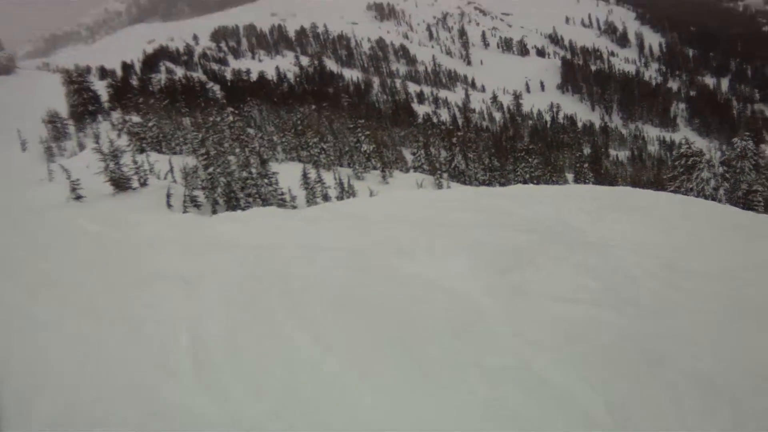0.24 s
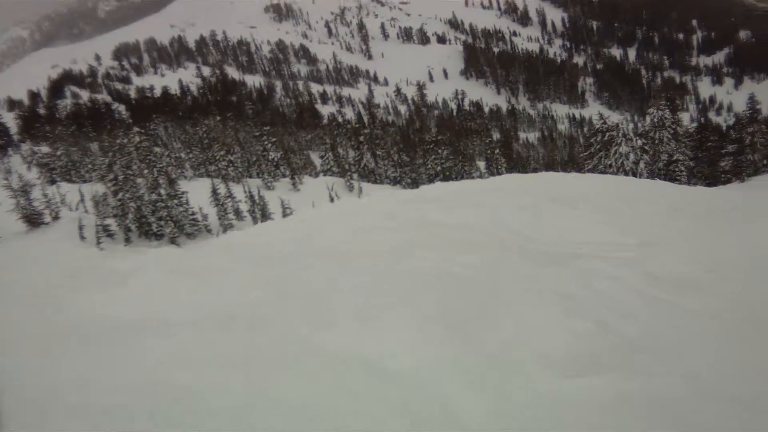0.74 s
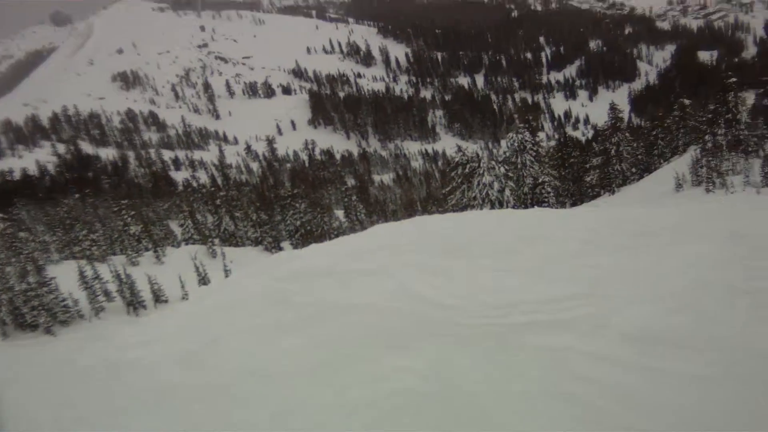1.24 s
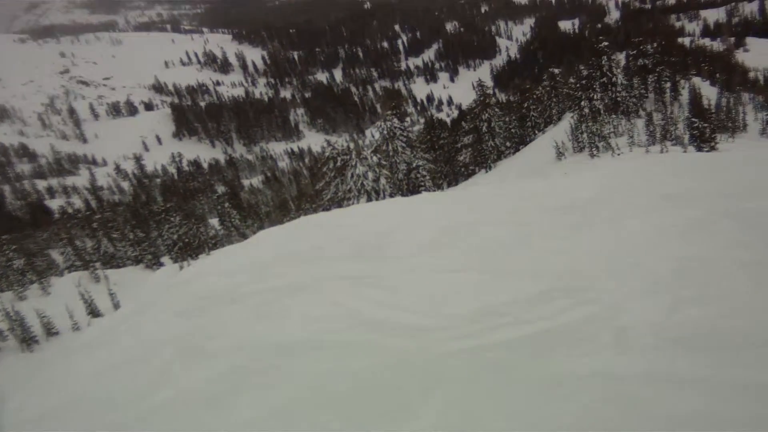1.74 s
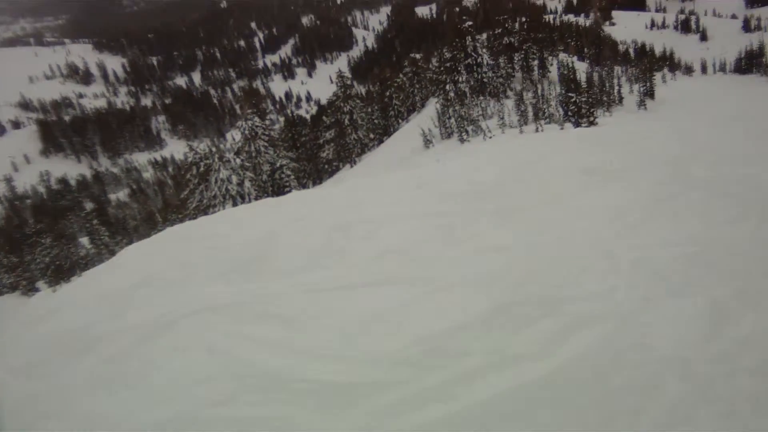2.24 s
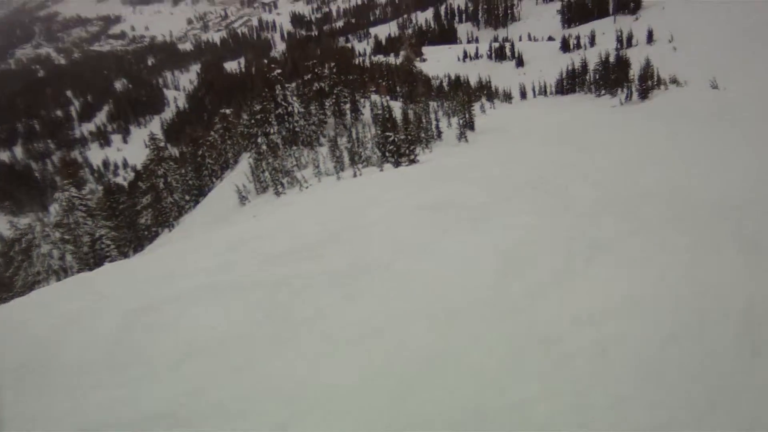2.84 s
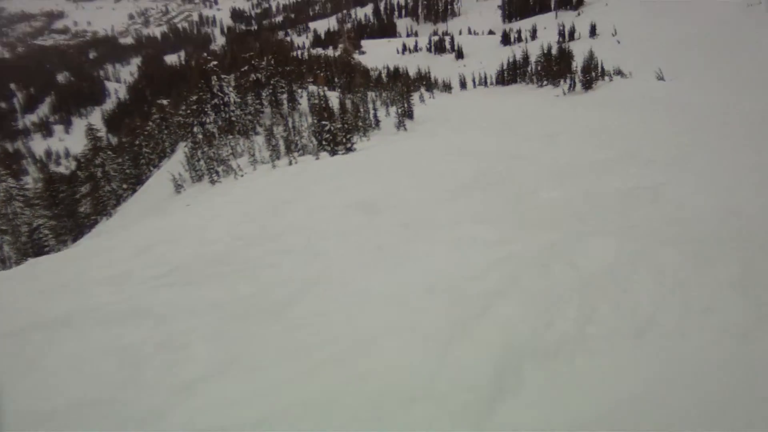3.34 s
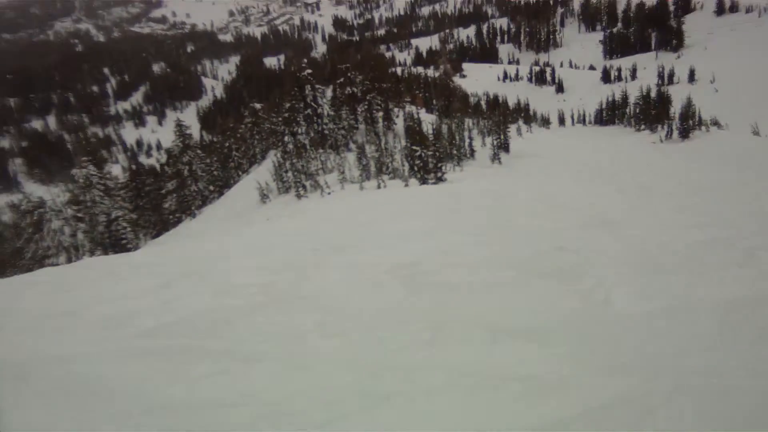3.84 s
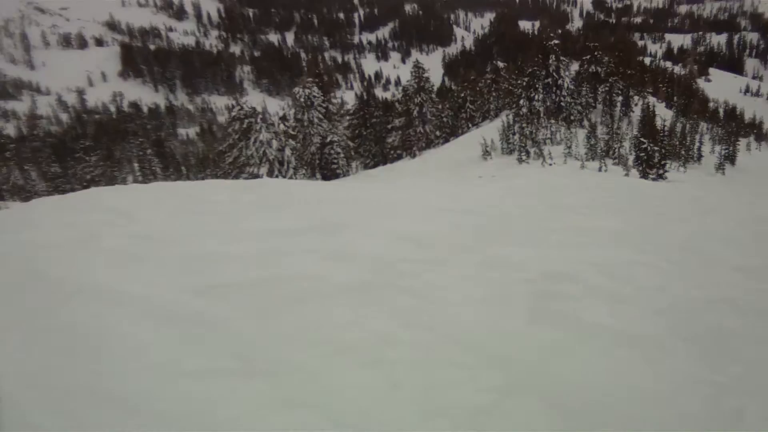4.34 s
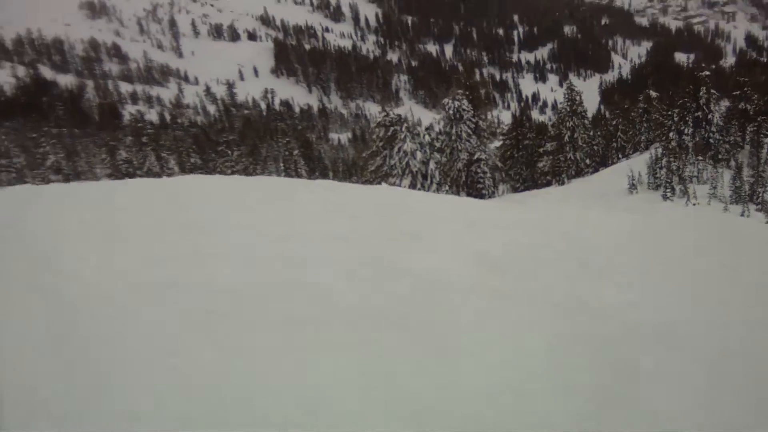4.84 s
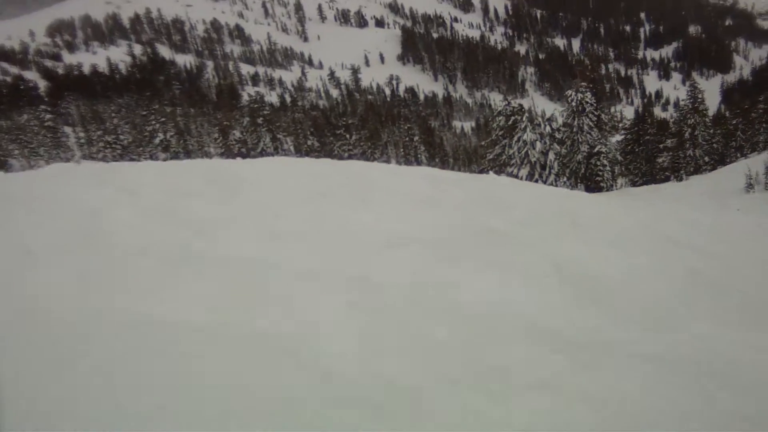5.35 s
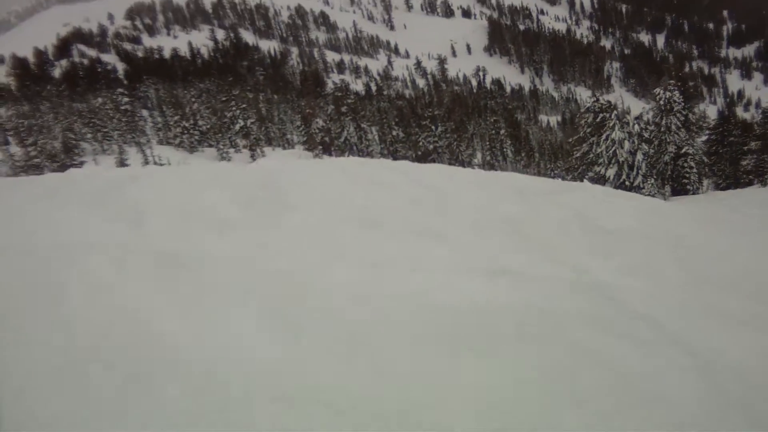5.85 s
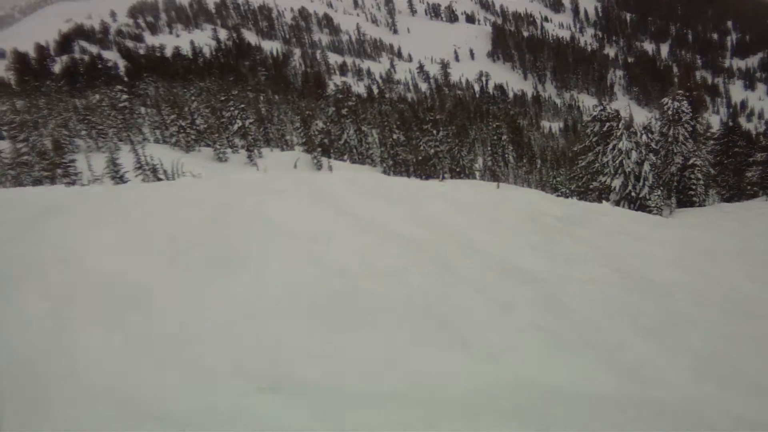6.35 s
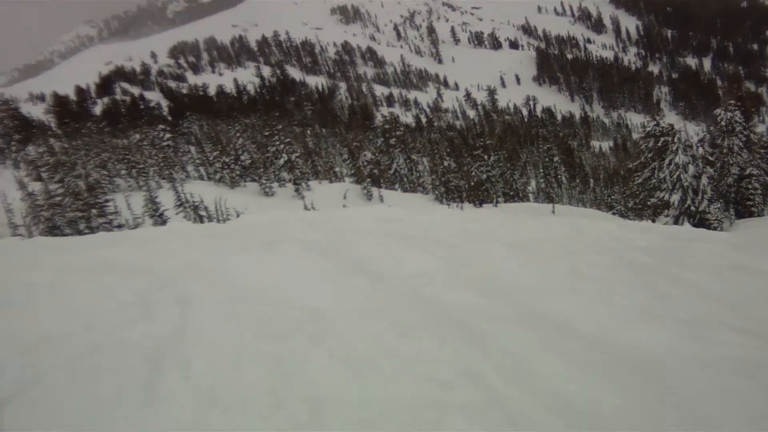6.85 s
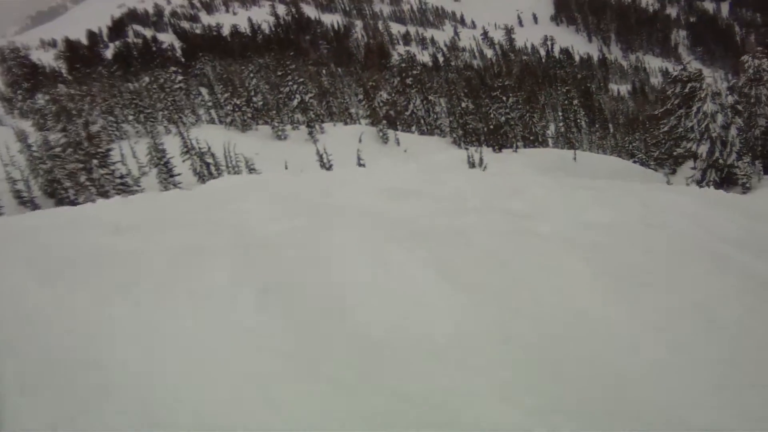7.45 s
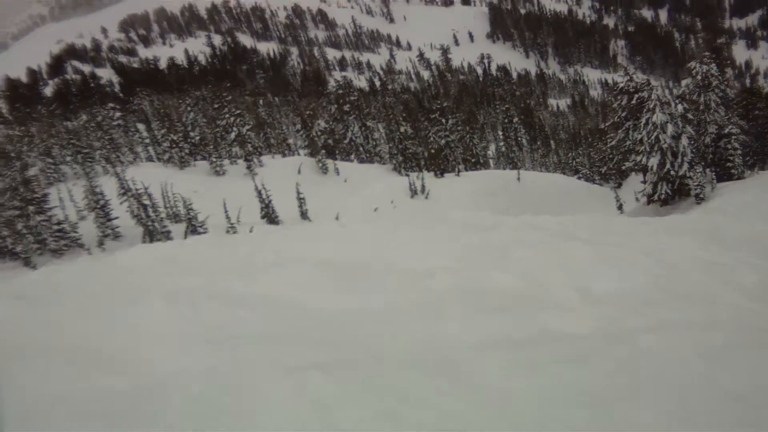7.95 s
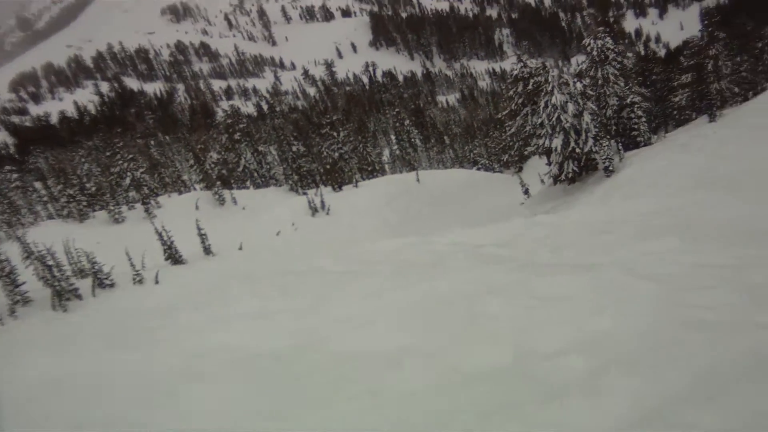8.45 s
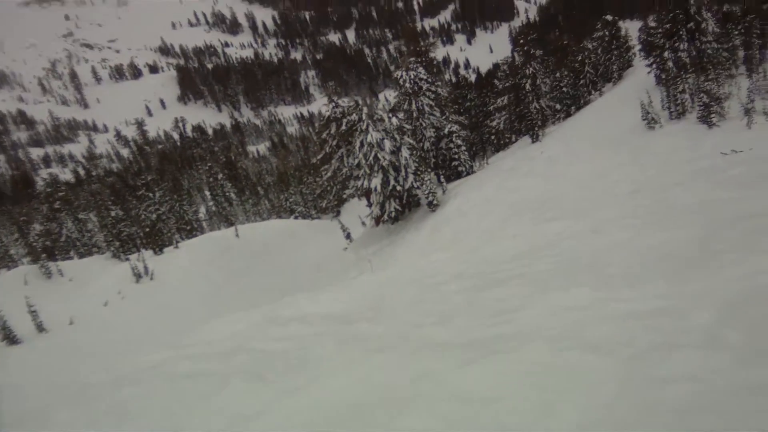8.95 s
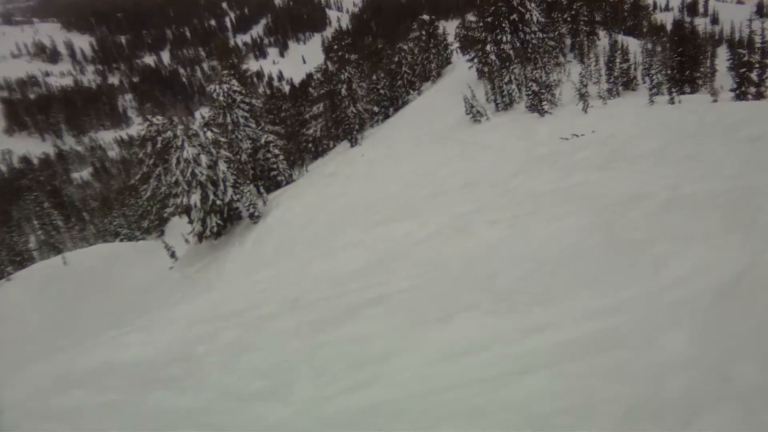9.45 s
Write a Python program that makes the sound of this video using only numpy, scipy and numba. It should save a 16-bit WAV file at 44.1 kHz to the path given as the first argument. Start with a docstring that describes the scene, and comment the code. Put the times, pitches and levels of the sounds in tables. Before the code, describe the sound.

Wind buffets a small microphone in crackling, thudding bursts while skis rush softly over snow, hissing and rasping through linked turns.

```python
"""Wind buffets a small hand-held camera while a skier links turns down a soft snow slope.
The air hits the microphone port as filtered random pulses: faster flow is louder and brighter, its eddies smaller.
Now and then air skimming the port rings it like a bottle. Under the wind the skis rush over the snow, hiss and
throw up spray, all shaped noise coloured by the camera's housing. Edges rasp on firm patches and gear squeaks."""
import sys
import numpy as np
from scipy import signal
from scipy.fft import rfft, irfft
from scipy.io import wavfile
from scipy.ndimage import uniform_filter1d
from numba import njit

SR = 44100
rng = np.random.default_rng(int(sys.argv[2]) if len(sys.argv) > 2 else 0)


def bounce(signal):
    """Save signal as a 16-bit WAV file at the path given by the first command-line argument."""
    frames = np.transpose(np.atleast_2d(signal))
    limited = np.clip(frames, -1, 1)
    pcm = np.round(limited * 32767).astype(np.int16)
    wavfile.write(sys.argv[1], SR, pcm)


N = 427329
T = np.arange(N) / SR  # time of each sample, s
FREQS = np.maximum(np.arange(N // 2 + 1) * SR / N, 1)  # frequency of each spectrum bin, Hz

# rush of the ski bases, following speed and weight on the snow: (time [s], level [dB])
GLIDE_LEVELS = [(0, -60.5), (.33, -68.5), (.5, -65.5), (.6, -63.5), (.68, -69.5), (.8, -70), (1.05, -76.5),
                (1.5, -63), (2.1, -53.5), (2.85, -64), (3.65, -56), (4.08, -59.5), (4.22, -60),
                (4.6, -54.5), (4.73, -57.5), (4.88, -55.5), (5.05, -58), (5.85, -69.5), (6.2, -63.5),
                (7.95, -66.5), (8.15, -73), (8.28, -74), (8.39, -66.5), (8.5, -71), (8.87, -79),
                (8.96, -70.5), (9.12, -60), (9.69, -61.5)]


def undb(db):
    """Decibels to gain."""
    return 10 ** (np.asarray(db) / 20)


def unit(x):
    """Scale to rms 1."""
    return x / np.sqrt(np.mean(x ** 2))


def level_curve(table):
    """Join the (time, level) points of a table by straight lines."""
    times, levels = np.transpose(table)
    return np.interp(T, times, levels)


def walk(rate_hz, size=16384):
    """Smooth random motion up to about rate_hz, spread about 1."""
    hz = np.arange(size // 2 + 1) * SR / N
    slow = irfft(rfft(rng.standard_normal(size)) / (1 + (hz / rate_hz) ** 4))
    return np.interp(T, np.linspace(0, N / SR, size), unit(slow))


def waver_db(rate_hz, depth_db):
    """Random wavering in dB that never strays beyond twice depth_db."""
    return depth_db * 2 * np.tanh(walk(rate_hz) / 2)


def flutter(rate_hz, depth_db):
    """A randomly wavering gain of mean power 1."""
    return unit(undb(waver_db(rate_hz, depth_db)))


def grains(per_second, spread_db):
    """Random single-sample impulses of uneven size and either sign, rms 1 overall."""
    hit = rng.random(N) < per_second / SR
    sign = rng.choice([-1, 1], N)
    size = undb(spread_db * np.clip(rng.standard_normal(N), -2, 2))
    return unit(hit * sign * size)


def colour(x, spectrum, lo_hz, hi_hz):
    """Shape white noise x by a spectrum, so that its band lo_hz-hi_hz has rms about 1."""
    hz, db = np.transpose(spectrum)
    gain = undb(np.interp(np.log(FREQS), np.log(hz), db))
    in_band = (FREQS > lo_hz) & (FREQS < hi_hz)
    band_rms = np.sqrt(np.mean(gain ** 2 * in_band))
    return irfft(rfft(unit(x)) * gain / band_rms, N)


def band(hz, width_hz):
    """Noise in one resonance, rms 1."""
    resonance = 1 / (1 + ((FREQS - hz) / (width_hz / 2)) ** 2)
    return unit(irfft(rfft(rng.standard_normal(N)) * resonance, N))


def swell(s, db, half):
    """Gain of a bell-shaped swell centred on s; it is down to 37 % at half seconds to either side."""
    return undb(db) * np.exp(-((T - s) / half) ** 2)


def shifted(x, octaves):
    """Slide the whole spectrum of x up or down over time by reading it faster or slower."""
    position = np.cumsum(2 ** octaves) % N
    return np.interp(position, np.arange(N), x)


def steadied(x, window_s, share):
    """Even out a share of the chance swings in the level of x."""
    size = int(window_s * SR)
    power = uniform_filter1d(uniform_filter1d(x ** 2, size), size)
    return x / np.maximum(power, 1e-6) ** (share / 2)


@njit
def lowpass(x, hz, order):
    """A chain of one-pole low-passes whose corner moves every sample."""
    y, state = np.empty(len(x)), np.zeros(order)
    for i in range(len(x)):
        g = np.tan(np.pi * min(hz[i], .4 * SR) / SR)
        v = x[i]
        for k in range(order):
            step = (v - state[k]) * g / (1 + g)
            v = state[k] + step
            state[k] = v + step
        y[i] = v
    return y


def squeaks():
    """Tiny squeaks of the gear: brief, thin stick-slip tones."""
    # (time [s], level [dB], half length [s], pitch [Hz])
    squeak_list = [(1.326, -79, .009, 6550), (7.768, -76.5, .011, 6480)]
    # a sine times the square root of 2 has rms 1
    return sum(swell(s, db, half) * np.sqrt(2) * np.sin(2 * np.pi * hz * T) for s, db, half, hz in squeak_list)


def edges():
    """Steel edges rasp over firmer patches of snow: swells of noise, each in one broad resonance."""
    # (time [s], level [dB], half length [s], centre [Hz])
    rasp_list = [(.84, -79, .04, 1900), (1.275, -78.5, .16, 2530), (1.365, -75, .008, 4000),
                 (2.573, -69, .03, 3700), (2.68, -67, 0.088, 2380), (2.958, -69, 0.064, 3600),
                 (3.593, -71, 0.073, 3370), (4.15, -79, 0.089, 4000), (5.01, -72, 0.15, 1800),
                 (5.777, -72, .05, 2000), (6.07, -72, 0.054, 2200), (9.044, -71, .003, 2080)]
    width = 0.48  # as a share of the centre
    return sum(swell(s, db, half) * band(hz, width * hz) for s, db, half, hz in rasp_list)


def carve(bite, apex, swell_db_per_s, fade_db_per_s):
    """Gain of one turn: the edges bite quickly, press harder up to the apex, then ease off."""
    bite_s = 0.0085  # time the edges take to catch
    below_db = np.maximum(swell_db_per_s * (apex - T), fade_db_per_s * (T - apex))
    return np.clip((T - bite) / bite_s, 0, 1) * undb(-below_db)


def snow_levels():
    """Gains of rush, hiss and spray: the turns add their power to that of skis running flat."""
    # turns, levels before the trims in skis():
    # (edges bite [s], apex [s], hiss of the edges at the apex [dB], fine spray at the apex [dB])
    turn_list = [(0, 0.027, -72.5, -83.5), (0.4, 0.48, -73, -80), (2.13, 2.81, -64.5, -75),
                 (4.805, 5.125, -67.5, -75.5), (6.9, 7.004, -70, -77.5), (7.752, 7.88, -73, -78),
                 (9.023, 9.255, -74, -79.5)]
    running_hiss_db = -15.5  # hiss of skis running flat, relative to the rush
    faint_hiss_db, faint_spray_db = -83.5, -82  # what stays between turns
    base = undb(level_curve(GLIDE_LEVELS))
    edge_power = (base * undb(running_hiss_db)) ** 2 + undb(faint_hiss_db) ** 2
    powder_power = undb(faint_spray_db) ** 2
    for bite, apex, hiss_db, spray_db in turn_list:
        edge = undb(hiss_db) * carve(bite, apex, swell_db_per_s=14.5, fade_db_per_s=11)
        powder = undb(spray_db) * carve(bite, apex, swell_db_per_s=7.5, fade_db_per_s=8)
        edge_power = edge_power + edge ** 2
        powder_power = powder_power + powder ** 2
    return base, np.sqrt(edge_power), np.sqrt(powder_power)


def skis():
    """The bases pack the snow with a hollow rush, the edges shear crystals, and loose powder sprays."""
    # spectra of the rush, the hiss and the spray: (frequency [Hz], relative level [dB per Hz])
    rush_spectrum = [(30, -23), (100, -13.5), (220, -11), (350, -4), (530, 0.5), (650, -5), (800, -11),
                     (1050, -20.5), (1600, -23.5), (3000, -77)]
    hiss_spectrum = [(500, -25), (1000, -4.5), (1700, 0.5), (2400, 3), (2900, -1), (3170, -7), (3550, -5),
                     (4280, -4), (4750, -20), (5850, -10.5), (6750, -16.5), (7500, -23), (9000, -20),
                     (15000, -24)]
    spray_spectrum = [(2500, -13), (5000, -1.5), (6500, 3), (7550, -2), (8300, 0), (9100, -1.5),
                      (9800, 1.5), (10250, -2), (10900, 2), (11650, -2.5), (12400, 1.5), (15500, -0.5)]
    hiss_trim_db, spray_trim_db = -0.5, -0.73
    rise_per_db, wander = 0.0041, 0.06  # shift of the rush, octaves: with its level, and by chance

    base, edge, powder = snow_levels()
    glide_db = level_curve(GLIDE_LEVELS)
    octaves = rise_per_db * (glide_db - glide_db.mean()) + wander * walk(rate_hz=9.01)
    rush = colour(grains(per_second=5000, spread_db=3.0), rush_spectrum, 346, 570)
    rush = shifted(rush, octaves) * flutter(rate_hz=33, depth_db=1.7)
    hiss = colour(grains(per_second=14000, spread_db=6.0), hiss_spectrum, 1760, 3800)
    hiss = hiss * flutter(rate_hz=48, depth_db=1.08)
    spray = colour(rng.standard_normal(N), spray_spectrum, 6100, 13400)
    spray = spray * flutter(rate_hz=33, depth_db=1.0)
    uneven_snow = flutter(rate_hz=13.0, depth_db=0.8)  # moves rush and hiss together
    on_snow = uneven_snow * (rush * base + hiss * edge * undb(hiss_trim_db))
    return on_snow + spray * powder * undb(spray_trim_db)


def skim():
    """Air skims across the port and blows it like a bottle, ringing its broad, hollow resonance."""
    # (time [s], level [dB], half length [s])
    skim_list = [(1.73, -46.5, 0.012), (1.832, -44, .014), (2.386, -51.5, 0.033), (3.818, -42.5, .016),
                 (3.876, -48, .012), (3.92, -50, 0.018), (7, -46.5, 0.011), (7.038, -56.5, 0.04),
                 (7.084, -41.5, 0.011), (7.107, -42.5, 0.01)]
    # spectrum of the port's resonance: (frequency [Hz], relative level [dB per Hz])
    port_spectrum = [(300, -18.5), (550, 2), (760, -0.5), (1080, -4), (1450, -17), (2500, -37), (5000, -74)]
    blow = sum(swell(s, db, half) for s, db, half in skim_list)
    puffs = grains(per_second=2500, spread_db=3)
    return blow * colour(puffs, port_spectrum, 300, 2500)


def airflow():
    """Level (dB) and eddy roll-off (Hz) of the flow, before wind() adjusts them: steady air plus buffets."""
    # steady airflow over the microphone, following the skier's speed: (time [s], level [dB])
    steady_levels = [(0, -73), (.98, -76.5), (1.06, -68.5), (1.22, -61.5), (1.57, -55), (1.8, -40),
                     (2.3, -53), (3.0, -46.5), (3.4, -49.5), (3.96, -52), (4.12, -66), (5.0, -69),
                     (5.85, -65), (6.4, -56.5), (7.3, -62.5), (8.05, -70), (8.15, -83.5), (8.45, -77),
                     (8.88, -68.5), (9.0, -61.5), (9.4, -57)]
    # buffets, where the flow catches the port, holds on and lets go:
    # (start [s], rise before it [s], length [s], level [dB], eddy roll-off [Hz])
    buffet_list = [(1.19, 0.0035, .022, -57.5, 324), (1.469, 0.0054, .027, -46, 800),
                   (1.623, .003, 0.049, -40, 660), (1.697, 0.0024, 0.027, -37.5, 1270),
                   (1.737, .003, 0.28, -41.5, 930), (1.924, 0.012, 0.026, -32, 1780),
                   (1.973, 0.0064, 0.038, -30, 1760), (2.056, .003, 0.026, -45, 890),
                   (2.121, .002, 0.091, -45.5, 920), (2.347, .005, 0.18, -47.5, 810),
                   (2.79, .02, .115, -46, 875), (3.5, .01, 0.16, -46, 860),
                   (3.718, 0.0057, 0.031, -42, 1100), (3.781, 0.004, 0.16, -48, 1180),
                   (3.808, 0.013, 0.022, -39.5, 1580), (3.853, .005, 0.022, -44, 1370),
                   (5.298, 0.013, 0.015, -55, 346), (5.551, .05, 0.06, -51.5, 535),
                   (5.681, 0.031, 0.035, -48, 460), (6.405, 0.004, .04, -45, 990),
                   (6.439, 0.004, 0.072, -38, 1120), (6.499, 0.006, 0.032, -34.5, 1140),
                   (6.545, .003, .04, -37, 1110), (6.618, 0.0026, .05, -36.5, 1220),
                   (6.688, .003, .067, -38.5, 930), (6.755, 0.013, 0.041, -36, 1060),
                   (6.821, .002, .039, -36.5, 940), (6.87, .003, 0.038, -45.5, 814),
                   (7.092, 0.0033, .084, -46.5, 640), (8.502, 0.0037, .042, -59.5, 370),
                   (8.587, .008, 0.21, -55, 564), (9.075, .003, .03, -48.5, 560),
                   (9.101, 0.0077, 0.028, -41.5, 650), (9.146, 0.0045, 0.069, -40.5, 880),
                   (9.219, .004, 0.045, -39.5, 850), (9.461, .004, 0.25, -49, 705),
                   (9.553, 0.005, .045, -44, 1000)]
    release_s = 0.012
    # faster air makes smaller eddies: the roll-off is calm_hz + rise_hz at reference_db,
    # and the rise doubles every doubling_db
    calm_hz, rise_hz, reference_db, doubling_db = 372, 258, -50, 11.5

    steady_db = level_curve(steady_levels)
    force = undb(steady_db)
    edge_hz = calm_hz + rise_hz * 2 ** ((steady_db - reference_db) / doubling_db)
    for s, rise, length, db, hz in buffet_list:
        near = (T > s - 3 * rise) & (T < s + length + 3 * release_s)
        age = T[near] - s
        before = np.minimum(age, 0) / rise
        after = np.maximum(age - length, 0) / release_s
        grip = np.exp(-before ** 2 - after ** 2)
        force[near] += grip * (undb(db) - force[near])
        edge_hz[near] += grip * (hz - edge_hz[near])
    return 20 * np.log10(force), edge_hz


def eddies(pressure, edge_hz, low_hz, order):
    """Turbulence dies away ever more steeply above edge_hz; the port passes little below low_hz. Rms near 1."""
    y = lowpass(pressure, edge_hz * np.sqrt(order / 2), order)
    # taking away the lows leaves the highs
    y = y - lowpass(y, low_hz, order=1)
    y = y - lowpass(y, np.full(N, 24.), order=1)
    width_hz = 2 / 3 * edge_hz / (1 + np.sqrt(2) * low_hz / edge_hz) ** 2
    return y * np.sqrt(SR / 2 / width_hz)  # make up for the power lost outside the band


def wind():
    """Eddies strike the port in clumps; each surge is both louder and brighter."""
    # single gusts that slap the port, the shortest as sharp cracks; level and roll-off before the trims below:
    # (time [s], level [dB], eddy roll-off [Hz], fade [s])
    gust_list = [(1.218, -42, 350, 0.0038), (1.322, -50.5, 400, 0.0083), (1.485, -44, 910, 0.0043),
                 (1.604, -39, 520, 0.0043), (1.619, -36.5, 1350, 0.0024), (1.645, -42, 1640, 0.0038),
                 (1.659, -40, 1640, 0.006), (1.677, -39.5, 1750, 0.0028), (1.698, -35, 1290, .004),
                 (1.71, -30, 1550, 0.004), (1.723, -39.5, 1560, 0.0048), (1.753, -38, 2200, 0.0013),
                 (1.767, -39.5, 1100, 0.0028), (1.789, -36, 1480, 0.01), (1.809, -36.5, 1330, 0.0072),
                 (1.83, -36, 1240, 0.0037), (1.836, -46, 1750, 0.0017), (1.86, -34, 950, 0.0054),
                 (1.868, -41, 1550, 0.00086), (1.877, -37, 1440, 0.0012), (1.912, -35.5, 1550, 0.0036),
                 (1.929, -29.5, 2500, 0.0021), (1.942, -33, 3000, 0.0023), (1.977, -38.5, 3960, 0.00067),
                 (1.981, -29, 3400, 0.00091), (2.008, -32.5, 2480, 0.0028), (2.071, -41, 1040, 0.0037),
                 (2.126, -41.5, 1150, 0.0039), (2.162, -29.5, 1320, 0.0037), (2.175, -47, 1600, 0.002),
                 (2.223, -40, 600, 0.0059), (2.309, -44.5, 1020, 0.012), (2.37, -42, 950, 0.008),
                 (2.409, -41.5, 1300, 0.0027), (2.467, -35.5, 980, 0.0026), (2.478, -43.5, 1140, 0.0029),
                 (2.491, -45, 1500, 0.0014), (2.505, -40.5, 840, 0.0036), (2.532, -44, 950, 0.0035),
                 (2.548, -40.5, 900, 0.0037), (2.618, -43, 600, .004), (2.686, -44, 550, .005),
                 (2.748, -46, 950, 0.0035), (2.771, -38, 870, 0.0032), (2.82, -38, 1250, 0.0021),
                 (2.867, -44, 1160, 0.0099), (2.885, -41, 1100, 0.0082), (3.034, -37, 1220, 0.003),
                 (3.089, -38, 583, 0.0055), (3.16, -36, 1300, 0.0046), (3.182, -43.5, 1050, 0.0057),
                 (3.212, -43, 845, 0.0042), (3.327, -44.5, 1000, 0.0026), (3.525, -39.5, 744, 0.0028),
                 (3.559, -42, 1440, 0.0048), (3.621, -40.5, 1030, 0.0035), (3.669, -48, 1200, 0.0036),
                 (3.696, -35, 1220, 0.0043), (3.729, -44.5, 1390, 0.0044), (3.822, -39, 1680, 0.0066),
                 (3.849, -35, 1250, 0.01), (3.877, -37.5, 1950, 0.0064), (3.9, -44, 1250, .004),
                 (3.923, -43, 1140, 0.0038), (3.956, -41, 1900, 0.0013), (3.985, -41.5, 1230, 0.0036),
                 (4.028, -50, 1250, 0.0098), (4.047, -45.5, 1250, 0.0027), (4.601, -44.5, 1150, 0.013),
                 (5.451, -43.5, 816, 0.012), (5.548, -45.5, 950, 0.0032), (5.56, -47, 700, 0.005),
                 (5.608, -48, 480, .008), (5.692, -37.5, 446, 0.0061), (6.159, -44, 800, 0.0053),
                 (6.232, -50, 750, 0.011), (6.275, -46.5, 666, 0.0083), (6.45, -36, 1320, 0.0034),
                 (6.461, -32.5, 1270, .003), (6.516, -33, 1770, 0.0031), (6.526, -34, 2050, 0.0017),
                 (6.534, -33, 1580, 0.0028), (6.559, -33, 1500, 0.0047), (6.572, -35, 1250, 0.0045),
                 (6.621, -35, 1660, 0.0054), (6.633, -35, 1550, 0.0051), (6.643, -34, 1890, 0.0036),
                 (6.701, -35.5, 1120, 0.0035), (6.766, -38, 1650, 0.003), (6.78, -36, 1370, 0.0043),
                 (6.793, -38, 1400, 0.0046), (6.821, -32, 1250, 0.0025), (6.839, -39, 1700, .003),
                 (6.857, -40.5, 1900, 0.0043), (6.864, -45, 2050, 0.0012), (6.898, -40, 1300, 0.0031),
                 (6.92, -41.5, 850, 0.0035), (7.131, -37.5, 750, .004), (7.142, -35.5, 950, 0.0042),
                 (7.276, -51, 560, 0.0073), (8.585, -51.5, 600, 0.0038), (8.628, -52, 680, 0.0033),
                 (8.671, -49.5, 680, 0.0056), (8.702, -42.5, 526, 0.0025), (8.757, -51.5, 780, 0.0031),
                 (8.773, -49.5, 330, 0.0079), (9.116, -39, 715, 0.0038), (9.148, -42.5, 1100, 0.0054),
                 (9.173, -31.5, 1230, 0.0043), (9.182, -35.5, 1450, 0.002), (9.206, -41, 1090, 0.0042),
                 (9.23, -39, 1460, 0.0029), (9.261, -45, 1100, 0.0065), (9.348, -39.5, 880, 0.0051),
                 (9.466, -43, 1250, 0.0066), (9.484, -38.5, 1280, 0.0027), (9.502, -43, 1100, 0.0031),
                 (9.521, -38, 1140, 0.0039), (9.566, -43.5, 1420, 0.0043), (9.636, -40.5, 1300, 0.0032),
                 (9.658, -44, 1180, 0.0076), (9.681, -44, 1300, .003)]
    flow_trim_db, gust_trim_db = -1.86, -0.2
    crackle_db, crunch_db = -14, -10  # gains beside the roar
    slap_db = 16  # size of a gust's pulse, relative to the rms of the random pressure
    bass_share = 0.26  # the port's bass corner as a share of the roll-off
    brightening = 0.19 / 2  # how far the roll-off follows a surge, as a power of its gain

    level_db, edge_hz = airflow()
    low_hz = bass_share * edge_hz
    surge_db = waver_db(rate_hz=160, depth_db=2.0) + waver_db(rate_hz=33, depth_db=2.0)
    force = undb(level_db + surge_db + flow_trim_db)
    # small eddies come in packets with gaps between them, so the top sputters more than the bass
    edge_hz = edge_hz * undb(brightening * surge_db) * flutter(rate_hz=210, depth_db=1.5)
    pressure = unit(grains(per_second=1200, spread_db=3.5) + 0.83 * rng.standard_normal(N))

    cores, caught = np.zeros(N), np.zeros(N)
    for s, db, hz, fade in gust_list:
        near = np.abs(T - s) < 5 * fade
        age = (T[near] - s) / fade
        grip = np.exp(-np.where(age < 0, 1.9 * age, age) ** 2)  # a gust hits faster than it fades
        force[near] += grip * (undb(db + gust_trim_db) - force[near])
        edge_hz[near] += grip * (hz - edge_hz[near])
        # its core is one big vortex, a single pressure pulse
        pressure[near] *= 1 - grip ** 4 / 3
        cores[int(s * SR)] = undb(slap_db)
        caught[near] += grip

    roar = eddies(pressure + cores, 0.81 * edge_hz, low_hz, order=8)
    roar = steadied(roar, window_s=0.011, share=0.59)
    # lone, tight vortices crackle above the roar
    vortices = grains(per_second=170, spread_db=1.0)
    crackle = eddies(vortices, 0.92 * edge_hz, edge_hz / 2, order=8)
    # each gust breaks up into a brief, bright crunch
    fragments = caught * grains(per_second=2500, spread_db=2.0)
    crunch = eddies(fragments, np.minimum(1.17 * edge_hz, 2300), 0.86 * edge_hz, order=10)
    return force * (roar + undb(crackle_db) * crackle + undb(crunch_db) * crunch)


def scene():
    """Wind and skis in the open, with no echo."""
    return (squeaks() + edges() + skis() + skim() + wind())[None]


def record(dry):
    """The microphone rounds the hardest buffets and the camera cuts the top steeply."""
    ceiling = .095  # loudest sample value the rounding lets through
    top_hz = 15300
    rounded = ceiling * np.tanh(dry / ceiling)
    steep_cut = signal.ellip(12, .1, 70, top_hz, fs=SR, output="sos")  # .1 dB ripple, 70 dB down above
    return signal.sosfilt(steep_cut, rounded)


dry = scene()
out = record(dry)
bounce(out)
```